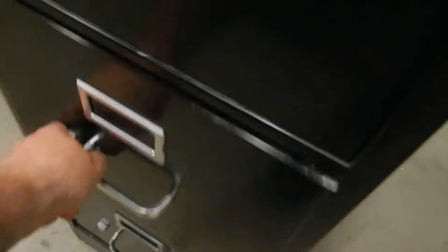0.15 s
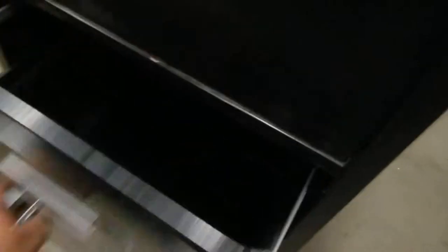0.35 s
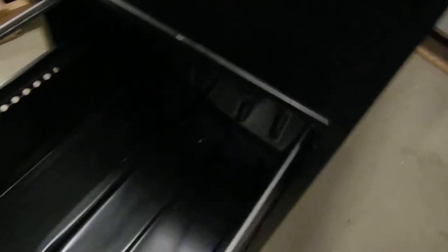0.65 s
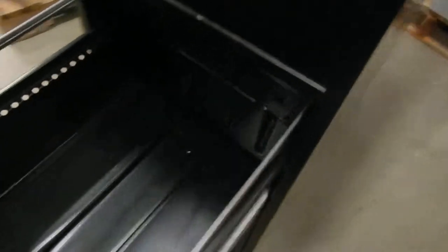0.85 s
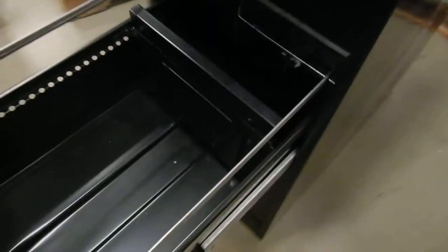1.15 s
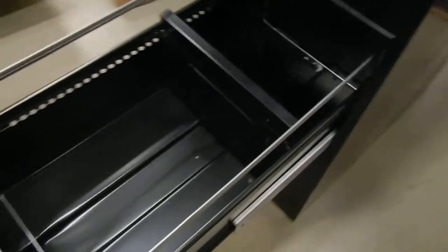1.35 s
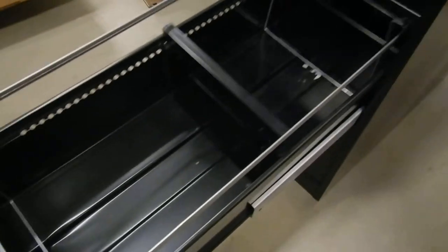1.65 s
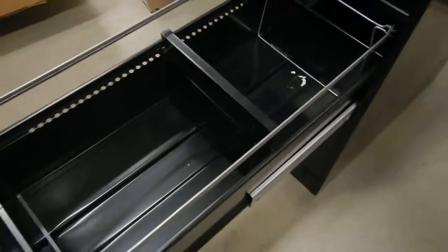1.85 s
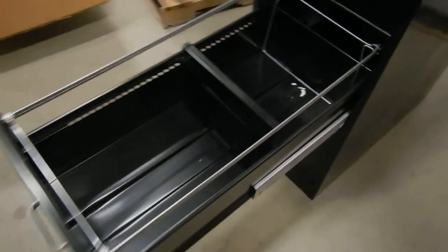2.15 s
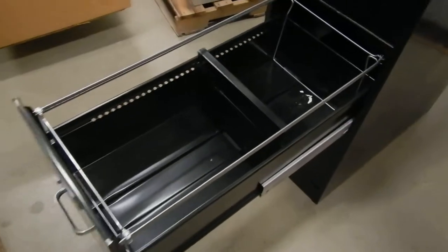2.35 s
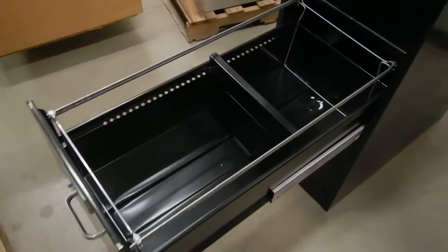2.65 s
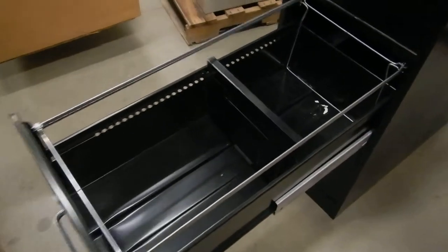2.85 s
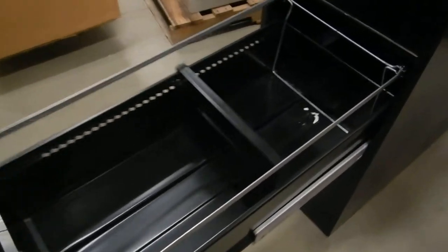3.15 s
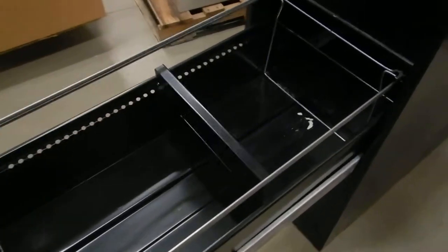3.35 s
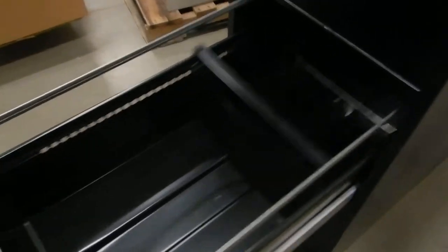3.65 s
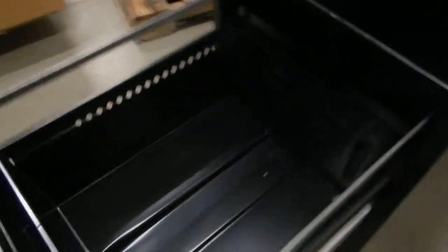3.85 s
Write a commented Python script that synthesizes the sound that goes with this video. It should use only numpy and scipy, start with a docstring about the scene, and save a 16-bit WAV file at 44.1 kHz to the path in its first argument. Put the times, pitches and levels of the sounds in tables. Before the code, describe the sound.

Close up, an empty metal cabinet drawer rolls open, gritty and hollow, knocking and scraping before a loud clanging thud; near quiet follows, then softer rolling and a hoarse rub as it is pushed back, in a reverberant room.

```python
"""In a large hard room with a soft rush of varying level, an empty steel file drawer is unlatched,
rolled out until it slams on its stop, and after a pause pushed back.
Rolling, scraping and rubbing are filtered noise and random grains; blows are decaying noise bursts and
struck parts sums of damped modes. Friction and blows excite the steel's response; a diffuse tail follows."""
import sys
import numpy as np
from scipy import signal
from scipy.fft import rfft, irfft
from scipy.io import wavfile
from scipy.ndimage import uniform_filter1d

SR = 44100
rng = np.random.default_rng(int(sys.argv[2]) if len(sys.argv) > 2 else 0)


def log_audio(samples):
    """Write samples as a 16-bit WAV file to the path given in sys.argv[1]."""
    # one column per channel
    frames = np.atleast_2d(samples).T
    # limit to full scale, then quantise
    limited = np.clip(frames, -1, 1)
    pcm = np.round(limited * 32767).astype(np.int16)
    wavfile.write(sys.argv[1], SR, pcm)


N = 176400
T = np.arange(N) / SR  # time [s]


def amp(db):
    """Level to amplitude ratio: 20 dB is a factor of ten."""
    return 10 ** (np.asarray(db) / 20)


def unit(x):
    """Normalises signal power: scales to rms 1."""
    return x / np.sqrt(np.mean(x ** 2) + 1e-20)


def read(points, hz):
    """Interpolates a table over logarithmic frequency, as pitch is heard."""
    f, value = np.transpose(points)
    return np.interp(np.log(hz + 1), np.log(f + 1), value)


def level(rows, order=1):
    """Amplitude envelope, linear in decibels, from one table column; falls by up to 120 dB outside it."""
    fade_s = 0.0207  # time to fall 60 dB
    rows = np.array(rows)
    outside = np.maximum(rows[0, 0] - T, 0) + np.maximum(T - rows[-1, 0], 0)
    inside_db = np.interp(T, rows[:, 0], rows[:, order])
    return amp(inside_db - 60 * np.minimum(outside / fade_s, 2))


def colour(x, points, tilt_db=0):
    """Minimum-phase filtering: a causal filter of unit power with the given spectrum and tilt per octave."""
    hz = abs(np.fft.fftfreq(4096, 1 / SR))
    octaves = np.log2(np.clip(hz, 300, 8000) / 2000)
    log_gain = np.log(amp(read(points, hz) + tilt_db * octaves))
    # the Hilbert transform of log gain gives the phase
    taps = np.fft.ifft(np.exp(np.conj(signal.hilbert(log_gain)))).real
    return signal.fftconvolve(x, taps[None] / np.linalg.norm(taps), axes=1)


def equalise(x, points):
    """Linear filtering without phase shift: a gain curve over frequency."""
    hz = np.fft.rfftfreq(2 * N, 1 / SR)
    return irfft(rfft(x, 2 * N) * amp(read(points, hz)))[..., :N]


def resonate(x, hz, width):
    """Heterodyne resonance: shifts the curve hz to zero, low-passes, shifts back; rms 1."""
    turn = np.exp(2j * np.pi * np.cumsum(hz) / SR)
    r = np.exp(-np.pi * width / SR)
    return unit((turn * signal.lfilter([1 - r], [1, -r], x / turn)).real)


def through(x, response):
    """Linear superposition: convolves the middle and side signals with a response."""
    return signal.fftconvolve(x, response, axes=1)[:, :N]


def add(mix, s, sound):
    """Superposition: mixes a sound in at a time."""
    part = mix[:, max(round(s * SR), 0):][:, :sound.shape[1]]
    part += sound[:, :part.shape[1]]


def smooth_noise(size, hz):
    """Slow random modulation: noise averaged over 1/hz seconds, rms 1."""
    return unit(uniform_filter1d(rng.standard_normal(size), int(SR / hz)))


def air():
    """Broadband room rush: stationary noise shaped by a spectrum and a slow envelope."""
    # spectrum of the room rush: (frequency [Hz], level [dB])
    spectrum = [(20, -23), (60, 2.5), (130, -1.5), (250, -6.5), (310, 0.5), (370, -7.5), (520, -10.5),
                (900, -16.5), (1900, -16.5), (3000, -24), (4600, -27.5), (6000, -40), (8000, -62),
                (15000, -70)]
    # its envelope: (time [s], level [dB])
    envelope = [(0, -29.5), (1.8, -43), (2.3, -47.5), (2.7, -52.5), (3.25, -43), (4, -46)]
    return unit(colour(rng.standard_normal((2, N)), spectrum)[:, :N]) * level(envelope)


def room():
    """Diffuse reverberation: noise decays exponentially in each band, longest in the bass."""
    # reverberation time of the room: (frequency [Hz], time to fall 60 dB [s])
    decay_times = [(80, 4.1), (250, 1.39), (600, 0.82), (2000, 0.99), (4500, 0.81), (8000, .55),
                   (14000, 0.41)]
    hz, t, z = signal.stft(rng.standard_normal((2, 2 * SR)), SR, nperseg=256)
    decay = amp(-60 * t / read(decay_times, hz)[:, None])
    tail = signal.istft(z * decay, SR, nperseg=256)[1]
    tail = tail * np.minimum(T[:tail.shape[1]] / 0.0049, 1)  # onset [s]
    return tail / np.linalg.norm(tail[0]) / 1.45


def cabinet():
    """Modal response of sheet steel: direct contact, a few clear modes and a dense field of weak ones."""
    # resonances of the sheet steel: (frequency [Hz], level [dB])
    resonances = [(646, -1.5), (1077, -10.5), (1295, -6.5), (1440, 2.5), (2186, -3), (2419, -9.5),
                  (4285, -5), (5222, -4)]
    modes_db, modes_t60 = 0.5, 0.071  # level [dB], time to fall 60 dB [s]
    sheet_db, sheet_t60 = -13.5, 0.14
    t = T[:SR // 2]
    damping = np.log(1000) / modes_t60
    modes = sum(amp(modes_db + db) * np.cos(2 * np.pi * hz * t) for hz, db in resonances)
    modes = modes * np.exp(-damping * t) * 2 * damping / SR
    sheet = rng.standard_normal((2, len(t))) * amp(-60 * t / sheet_t60)
    sheet = signal.sosfilt(signal.butter(2, 500, "high", fs=SR, output="sos"), sheet)
    out = (t == 0) + modes + amp(sheet_db) * unit(sheet) / np.sqrt(len(t))
    return out / np.linalg.norm(out[0])


def friction(spectrum, rough=1):
    """Asperity contact: tiny random impacts and noise, modulated by judder; rougher is grittier."""
    grains_per_s, spread_db = 700, 2
    grain_share, judder_db, judder_hz = 0.28, 1.5, 42.3  # power share and depth at rough = 1
    hits = rng.random(N) < grains_per_s / SR
    strength = amp(spread_db * np.minimum(rng.exponential(1, N), 3))
    grains = rng.standard_normal((2, N)) * hits * strength
    share = np.clip(grain_share * rough, 0, 1)
    force = np.sqrt(share) * unit(grains) + np.sqrt(1 - share) * rng.standard_normal((2, N))
    judder = amp(judder_db * rough * smooth_noise(N, judder_hz))
    return unit(colour(force * judder, spectrum)[:, :N])


def boom():
    """Low-frequency cabinet boom: band-shaped friction noise as the drawer runs back in."""
    # envelope of the boom: (time [s], level [dB])
    envelope = [(3.55, -46.5), (3.86, -23), (4, -45.5)]
    # its spectrum: (frequency [Hz], level [dB])
    spectrum = [(40, -37), (125, 14), (195, 14.5), (270, -33), (1500, -100)]
    return friction(spectrum, rough=0.56) * level(envelope)


def whisper():
    """High-frequency sliding friction: the inner slide whispers as it runs out."""
    # envelope of the whisper: (time [s], level [dB])
    envelope = [(.9, -84.5), (1.07, -63), (1.22, -61.5), (1.35, -50), (1.39, -69.5)]
    # its spectrum: (frequency [Hz], level [dB])
    spectrum = [(4000, -28.5), (6500, 6), (8000, -3), (10000, -8), (12500, -3), (15000, -14.5)]
    return friction(spectrum) * level(envelope)


def rub():
    """Friction exciting a wandering resonance: the slide rubs hoarsely as the drawer starts back."""
    # envelope of the rub: (time [s], level [dB])
    envelope = [(3.575, -71), (3.605, -33.5), (3.65, -43), (3.672, -32), (3.71, -39.5), (3.76, -48)]
    # its broad spectrum: (frequency [Hz], level [dB])
    spectrum = [(800, -30), (1900, 4.5), (2400, -2), (2900, -1), (3700, -3), (4300, -26), (7000, -47)]
    squeak_hz, width_hz, squeak_db = 2420, 160, -1
    wander_depth, wander_hz = 0.056, 25  # rms relative pitch change, averaging rate
    grate = friction(spectrum, rough=1.2)
    pitch = squeak_hz * (1 + wander_depth * smooth_noise(N, wander_hz))
    squeak = resonate(grate, pitch, width_hz)
    return unit(grate + amp(squeak_db) * squeak) * level(envelope)


def scrape():
    """Friction exciting narrow modes: the extending slide grates with a moving bright band and squeals."""
    # course of the scrape: (time [s], level [dB], brightest pitch [Hz])
    course = [(1.445, -42.5, 3700), (1.462, -25, 3800), (1.493, -21, 4800), (1.508, -29, 4430),
              (1.528, -28, 3800), (1.545, -39.5, 3730)]
    # spectrum of the grating: (frequency [Hz], level [dB])
    spectrum = [(1200, -23), (2500, -4.5), (3300, 4.5), (4400, -6), (5400, -3), (7000, -4), (10000, -15),
                (13000, -21), (15500, -48.5)]
    # resonances of the squealing slide: (frequency [Hz], width [Hz], level [dB])
    squeal_modes = [(3416, 76, -3.5), (3900, 72.5, -2.5), (4200, 80, 0), (4660, 140, 4), (5200, 45.2, -5.5)]
    bite_db, bite_width_hz, squeal_db = -1.5, 770, -11.5
    s, _, bite_hz = np.transpose(course)
    grate = friction(spectrum, rough=1.0)
    grate = grate + amp(bite_db) * resonate(grate, np.interp(T, s, bite_hz), bite_width_hz)
    squeal = 0
    for hz, width, db in squeal_modes:
        b, a = signal.iirpeak(hz, hz / width, fs=SR)
        squeal = squeal + amp(db) * unit(signal.lfilter(b, a, grate))
    return unit(unit(grate) + amp(squeal_db) * squeal) * level(course)


def catches():
    """Modal synthesis: each struck part rings in damped modes, with pitch glides and random side signs."""
    # modes of the parts that ring: (frequency [Hz], level [dB], time to fall 60 dB [s])
    parts = {
        "handle": [(734, 6.5, .06)],
        "rail": [(581, -2, 0.13), (1038, 5.5, .12), (1426, 7, 0.14), (2290, 7.5, .12), (2836, 13, 0.025),
                 (4110, 4, 0.089), (3310, 6.5, 0.031)],
        "roller": [(1566, 0.002, 0.063)],
        "stop": [(134.8, 5, 0.35), (188, -3.5, 0.4), (464, -9.5, 0.41), (1300, -11.5, 0.41),
                 (1376, -7.5, 0.2), (1733, 14.5, 0.017), (2433, 0, 0.18), (2720, -16, 0.75),
                 (3790, -5, 0.217), (4775, -5, 0.25)],
        "box": [(168.4, -12, 0.14), (259.3, 2.5, .06), (299, -6, 0.075)],
    }
    # strikes: (time [s], level [dB], initial relative rise of pitch [1/s], part [name])
    strikes = [(0, -23.5, -1, "handle"), (0.5159, -21.5, 6, "rail"), (1.052, -21, -1.5, "roller"),
               (1.8229, -19, 0, "stop"), (1.827, -6.5, 2, "box"), (3.719, -22, 2.5, "roller"),
               (3.799, -21.5, -1, "roller")]
    radiation_hz = 152  # below this the panels radiate little
    out, t = np.zeros((2, N)), T[:SR // 2]
    for s, db, glide, part in strikes:
        clock = np.cumsum(1 + glide * t * np.exp(-t)) / SR
        ring = 0
        for hz, mode_db, t60 in parts[part]:
            mode = amp(mode_db - 60 * t / t60) * np.sin(2 * np.pi * hz * clock)
            ring = ring + mode * np.array([[1], [rng.choice([-1, 1])]])
        add(out, s, amp(db) * ring)
    return signal.sosfilt(signal.butter(3, radiation_hz, "high", fs=SR, output="sos"), out)


def knocks():
    """Impact excitation: each blow is a crack, a short chatter of steel and a low thump of the panels."""
    # latch, roller and slide blows: (time [s], level [dB], low thump [dB], brightness [dB per octave])
    blows = [(0.013, -23.5, -29.5, 4), (.021, -24, -41.5, 1.5), (0.0789, -15, -21.5, 1),
             (0.138, -19.5, -21.5, 3.5), (.384, -31, -24.5, -9), (0.459, -22, -29.5, -7),
             (0.5163, -11, -45, 2), (.583, -25, -21.5, -7), (0.6407, -25.5, -40, 1), (0.9287, -28, -36, -5),
             (1.0527, -25, -33.5, -3.5), (1.2972, -35, -23.5, -1), (1.349, -38, -23, 3),
             (1.4369, -27.5, -21.5, 6.5), (1.8089, -25, -29, 2), (1.823, -12.5, -25.5, -0.5),
             (1.828, -11.5, -17.5, 0), (1.848, -13, -28.5, 3.5), (1.8598, -21.5, -29.5, 2),
             (1.891, -20.5, -16, -1), (3.3, -44.5, -29.5, -1), (3.342, -57, -26, 6),
             (3.379, -40, -23.5, -5.5), (3.503, -37, -40, -6.5), (3.6723, -40, -47, -9),
             (3.7207, -27.5, -28, -3.5), (3.803, -29.5, -39, 0), (3.845, -37, -17.5, 0.5),
             (3.908, -30, -19.5, -4.5), (3.9602, -27.5, -13, -2.5)]
    # spectrum of crack and chatter: (frequency [Hz], level [dB])
    clang = [(100, -26.5), (400, -11), (700, -2.5), (1000, -4.5), (1500, 0.5), (2700, 2), (4600, -1.5),
             (6000, -9), (8000, -18), (10000, -34.5), (12500, -30), (16000, -45.5)]
    # spectrum of the panel thump: (frequency [Hz], level [dB])
    thump_tone = [(30, -33.5), (90, -23), (150, -12.5), (215, 0.5), (280, 2.5), (340, -4.5), (420, -28.5),
                  (1500, -38), (5000, -81)]
    rise_s, crack_s, chatter_share = 0.0014, 0.0017, 0.91  # time constants, amplitude
    full_s, full_db, growth = 0.026, -12, 0.19  # chatter time at full level; dB of length per dB of level
    clatter_db, clatter_hz = 3, 250  # uneven rebounds
    thump_s, thump_ring_s, thump_ring_share = 0.0021, 0.059, 0.35
    out, t = np.zeros((2, N)), T[:SR // 3]
    for s, db, thump_db, tilt_db in blows:
        high, low = rng.choice([-1., 1.], (2, 2, len(t)))
        chatter_s = full_s * amp(growth * (db - full_db))  # harder blows chatter longer
        rebounds = unit(amp(clatter_db * smooth_noise(len(t), clatter_hz)))
        decay = np.exp(-t / crack_s) + chatter_share * rebounds * np.exp(-t / chatter_s)
        crack = high * (1 - np.exp(-t / rise_s)) * decay
        add(out, s, amp(db) * colour(crack, clang, tilt_db))
        # an impulse with the energy of a burst that decays over thump_s
        impulse = (t == 0) * np.sqrt(thump_s * SR / 2)
        thump = low * thump_ring_share * np.exp(-t / thump_ring_s) + impulse
        add(out, s, amp(thump_db) * colour(thump, thump_tone))
    return out


def rollers():
    """Rolling contact noise: swelling and sinking drumming of cabinet and panels, gritty rasp and rail hiss."""
    # rolling out: (time [s], rumble [dB], panel drone [dB], roller rasp [dB], rail hiss [dB])
    pull = [(0, -34, -33.5, -32, -35), (.05, -37.5, -34.5, -30.5, -35.5), (.09, -28.5, -22, -24, -33.5),
            (.22, -29.5, -23, -29.5, -38.5), (.35, -42, -23.5, -30.5, -46), (.43, -26, -24.5, -29.5, -39.5),
            (.5, -26, -22.5, -27, -31), (.55, -46.5, -40, -30, -33.5), (.63, -55, -33, -36, -70),
            (.69, -33.5, -28.5, -32, -38), (.82, -42.5, -31.5, -36, -49.5), (.95, -44, -28.5, -33, -40.5),
            (1.1, -37, -27, -30.5, -36.5), (1.24, -58, -30, -35.5, -47.5), (1.35, -33, -29.5, -33.5, -36),
            (1.39, -43.5, -33, -36, -45), (1.52, -45, -26.5, -35, -49), (1.6, -37.5, -39, -38, -49.5),
            (1.67, -39.5, -31.5, -36, -47), (1.81, -41, -32, -32, -43.5), (2.03, -47, -41.5, -40.5, -45.5),
            (2.2, -52, -51, -58, -81)]
    # rolling in: (time [s], rumble [dB], panel drone [dB], roller rasp [dB], rail hiss [dB])
    push = [(3.26, -71, -69, -75, -61), (3.3, -51, -43, -52, -61), (3.39, -46, -40, -42.5, -66),
            (3.45, -51, -42.5, -45.5, -58), (3.57, -41, -33, -37.5, -54.5), (3.73, -39, -27, -31.5, -37.5),
            (3.85, -47, -23, -30, -38.5), (3.92, -36, -27, -32.5, -45), (4, -46, -32, -28, -37)]
    # cabinet rumble: (frequency [Hz], level [dB])
    rumble = [(15, -20.5), (40, -16), (70, 0.5), (115, 1), (170, -7), (400, -59), (2000, -93)]
    # panel drone: (frequency [Hz], level [dB])
    drone = [(50, -49), (105, -5), (140, 0), (185, -1), (222, -0.5), (275, 1), (325, -4), (375, -6.5),
             (430, -26.5), (2000, -64.5)]
    # roller rasp: (frequency [Hz], level [dB])
    rasp = [(200, -36.5), (420, 1), (650, 4), (900, 3.5), (1500, 0.5), (2400, -3.5), (3300, -10),
            (6000, -44.5), (12000, -70)]
    # rail hiss: (frequency [Hz], level [dB])
    hiss = [(800, -43), (2200, -9), (3000, 2.5), (4800, 4.5), (5700, -7), (7500, -14.5), (10000, -37),
            (12500, -30.5), (15500, -45)]
    out = np.zeros((2, N))
    for order, (spectrum, rough) in enumerate([(rumble, 0.25), (drone, 0.33), (rasp, 0.93), (hiss, 0.88)], 1):
        out += friction(spectrum, rough) * (level(pull, order) + level(push, order))
    return out


def scene():
    """Superposition of direct and reverberant sound as middle and side, then left and right."""
    # stereo width: (frequency [Hz], gain of the side signal [dB])
    width = [(30, -5), (120, -33.5), (300, -26), (700, -19), (1400, -20), (2800, -11.5), (5500, -5.5),
             (10000, -1)]
    reverb_db = -13
    steel, hall = cabinet(), room()
    rolling = through(rollers() + scrape() + rub() + whisper() + boom(), steel)
    blows = through(knocks(), steel) + catches()
    reverb = through(amp(reverb_db) * (blows + rolling), hall)
    mid, side = rolling + blows + air() + reverb
    side = equalise(side, width)
    return np.array([mid + side, mid - side])


def record(dry):
    """Transducer response: the microphone dulls the top, peaks saturate softly, then the band is limited."""
    # treble loss of the microphone: (frequency [Hz], gain [dB])
    top_loss = [(9000, -1.5), (13000, -3), (15000, -15)]
    edge_hz = 15750
    dull = equalise(dry, top_loss)
    soft = dull / (1 + (dull / .95) ** 6) ** (1 / 6)
    low_pass = signal.firwin(511, edge_hz, window=("kaiser", 9), fs=SR)
    return signal.oaconvolve(soft, low_pass[None], "same")


dry = scene()
out = record(dry)
log_audio(out)
```